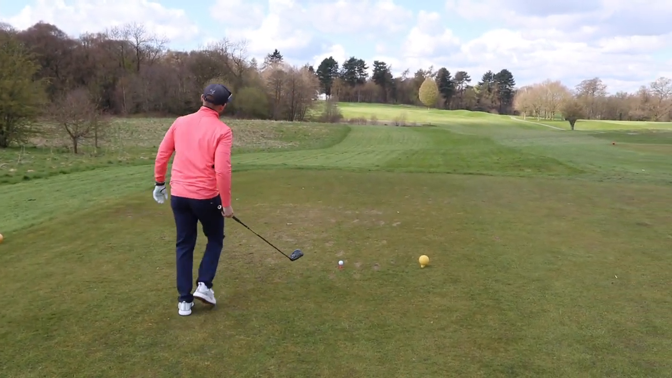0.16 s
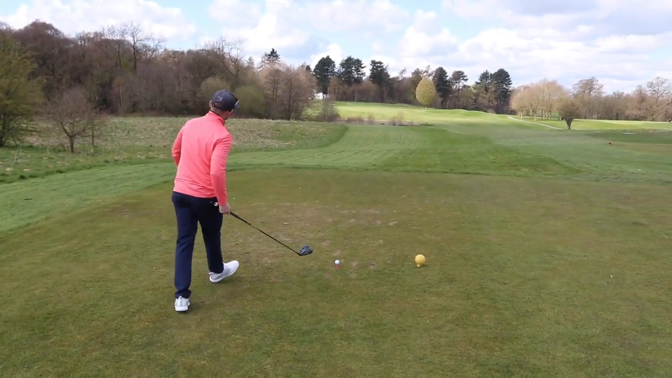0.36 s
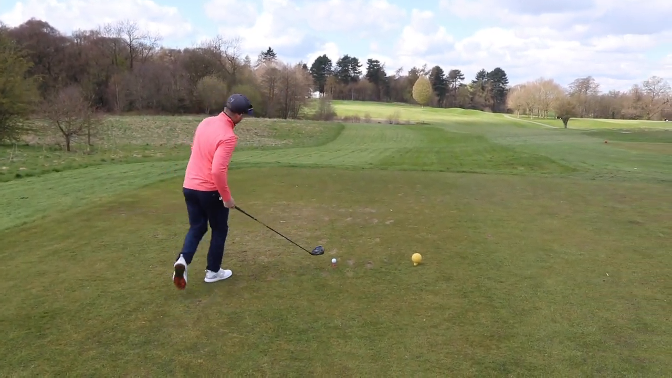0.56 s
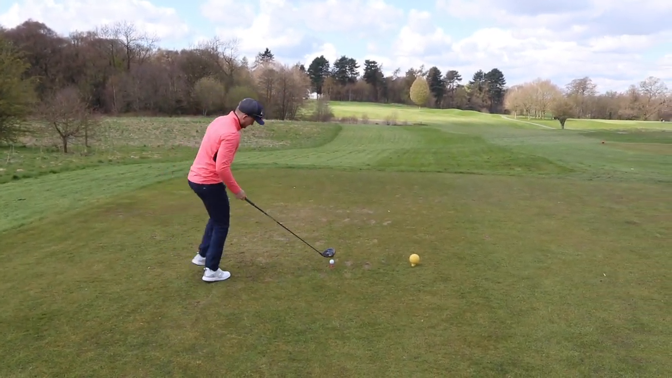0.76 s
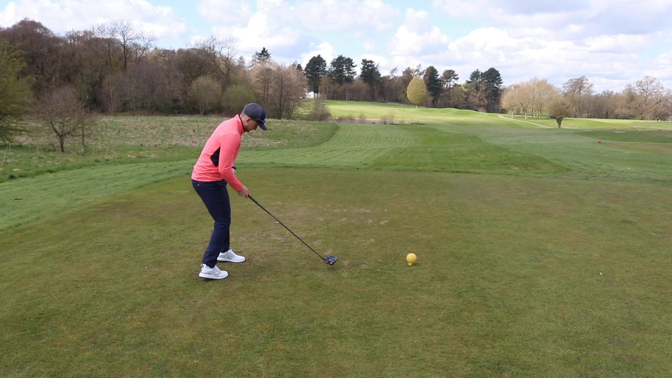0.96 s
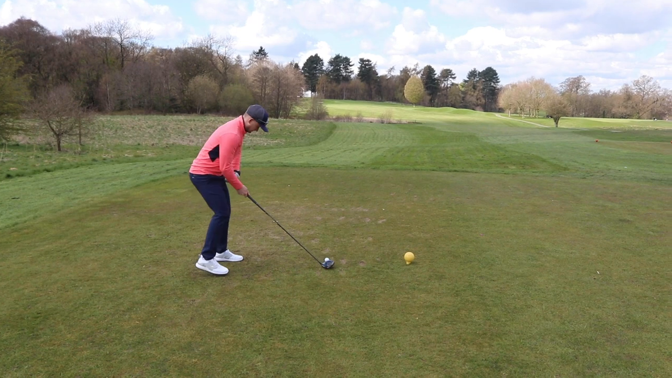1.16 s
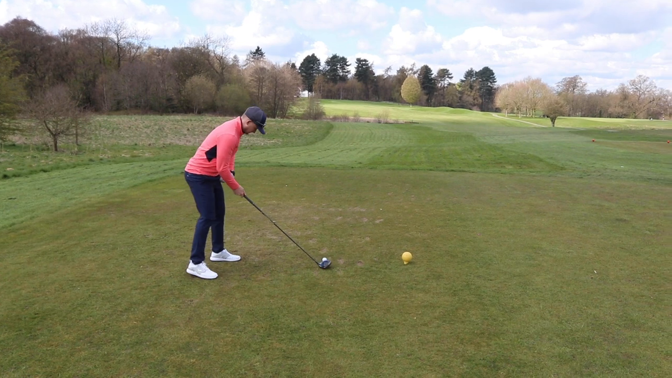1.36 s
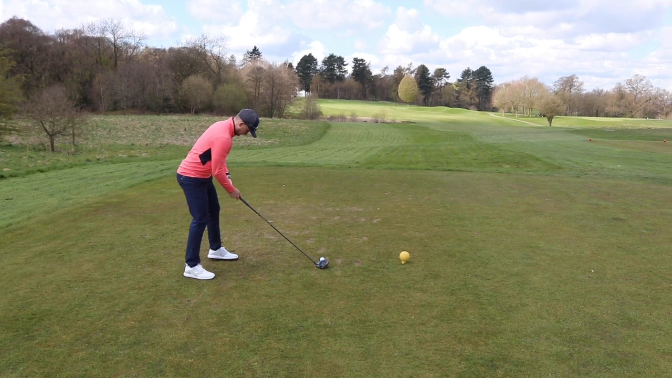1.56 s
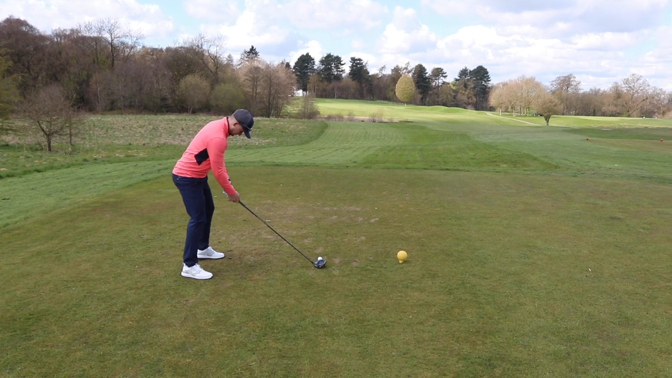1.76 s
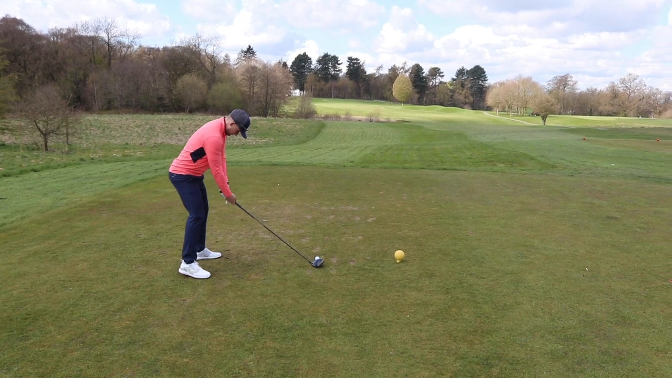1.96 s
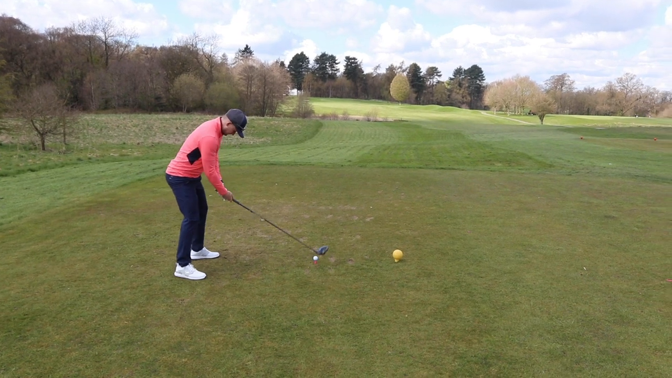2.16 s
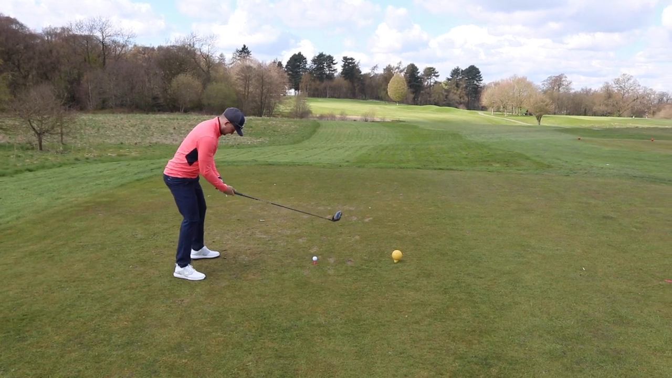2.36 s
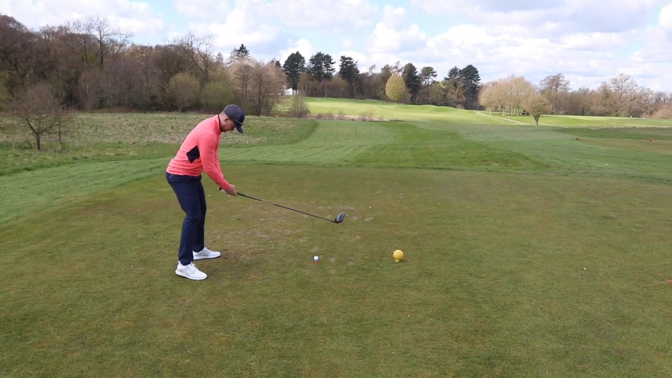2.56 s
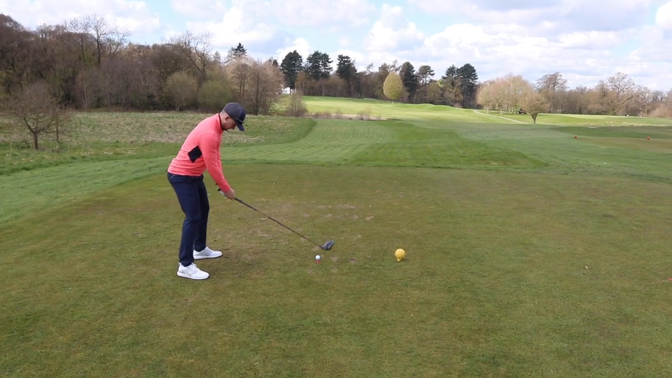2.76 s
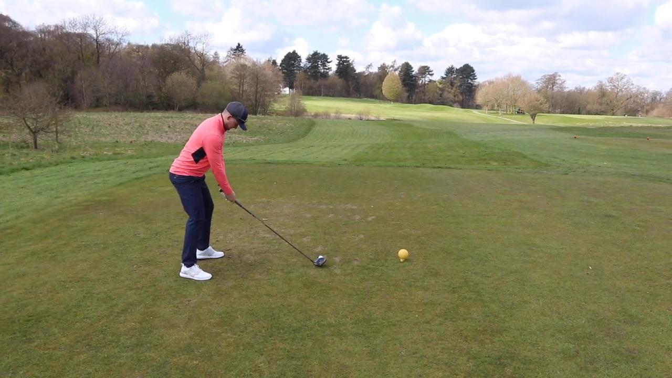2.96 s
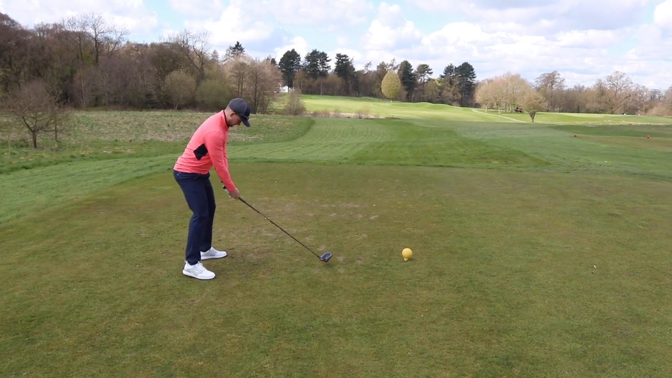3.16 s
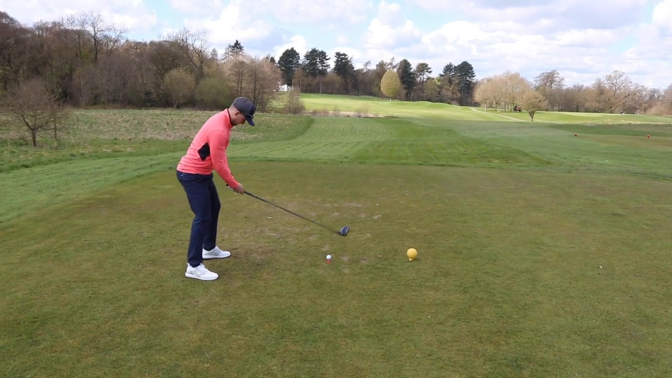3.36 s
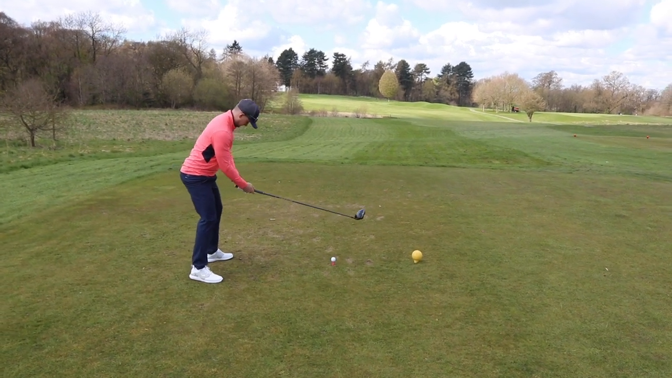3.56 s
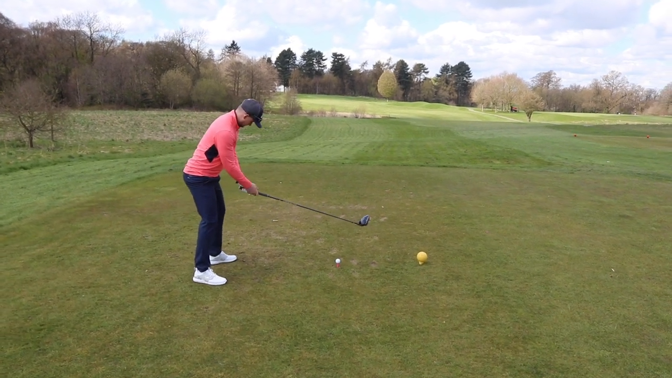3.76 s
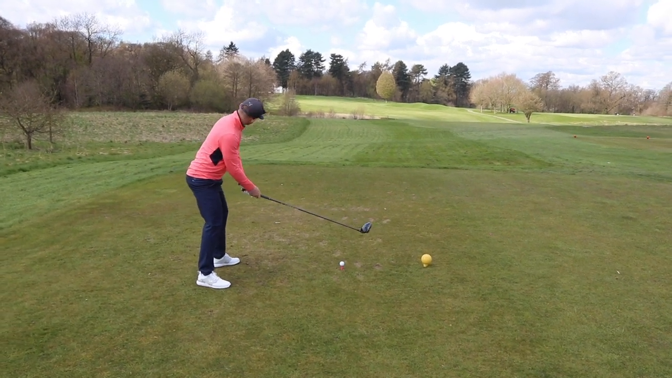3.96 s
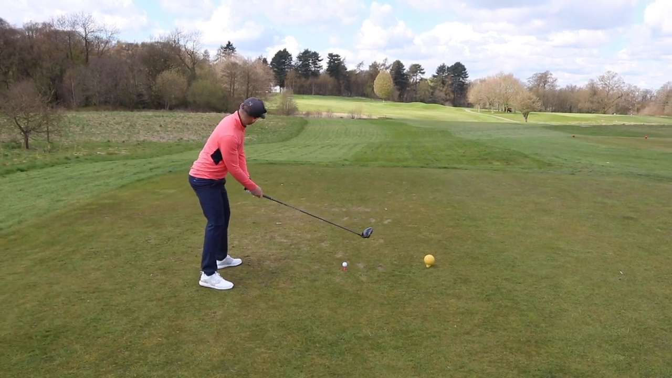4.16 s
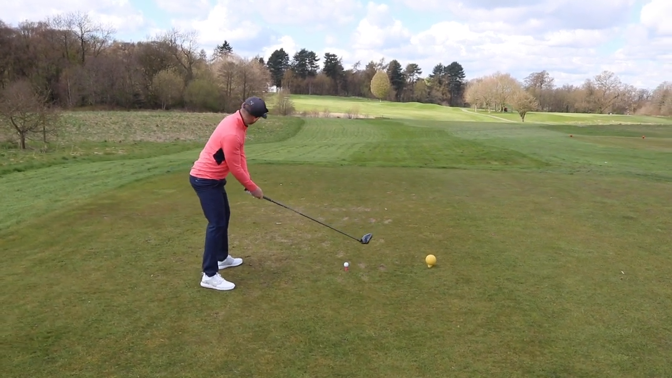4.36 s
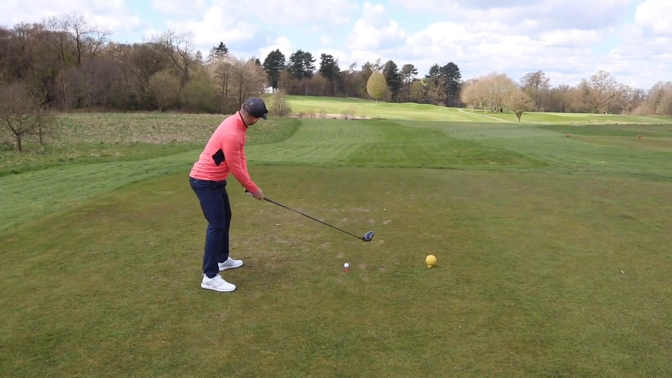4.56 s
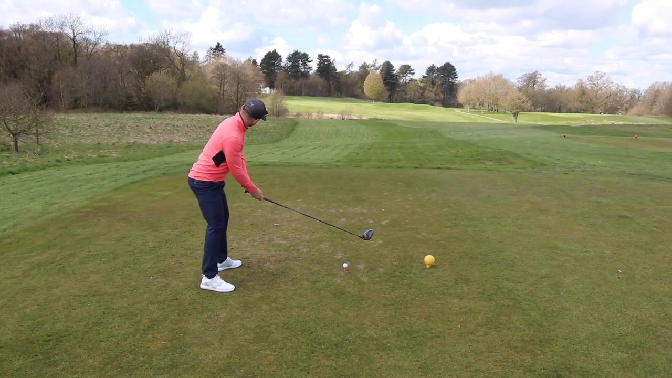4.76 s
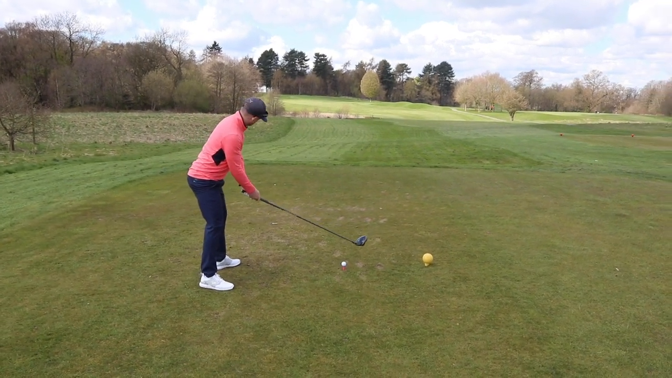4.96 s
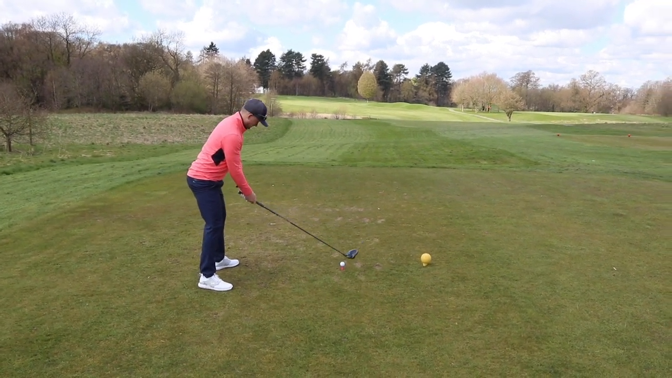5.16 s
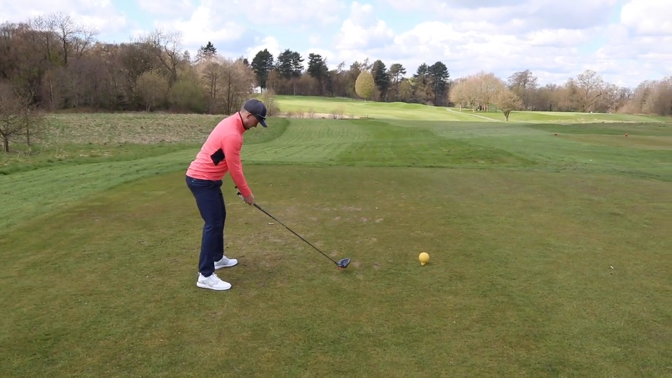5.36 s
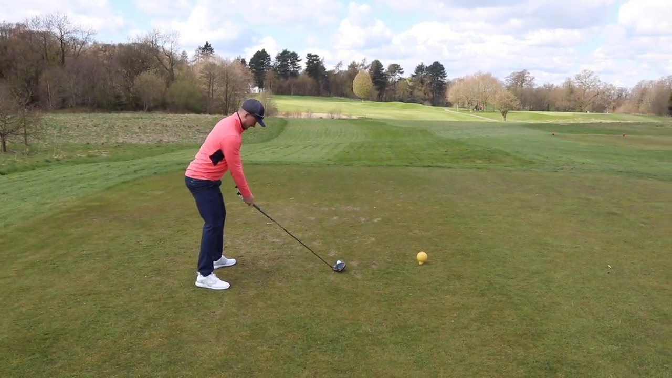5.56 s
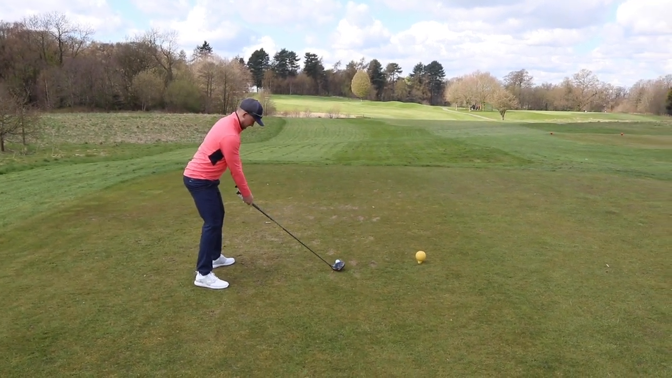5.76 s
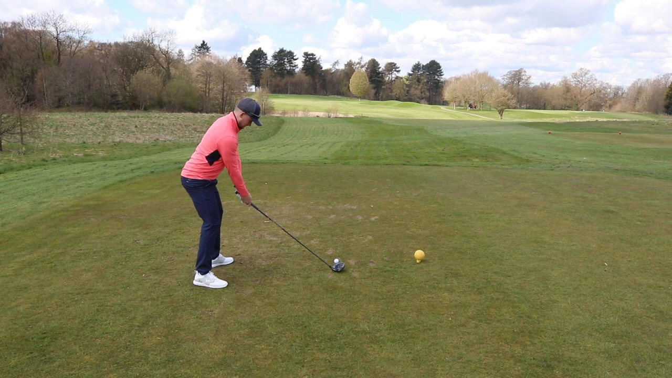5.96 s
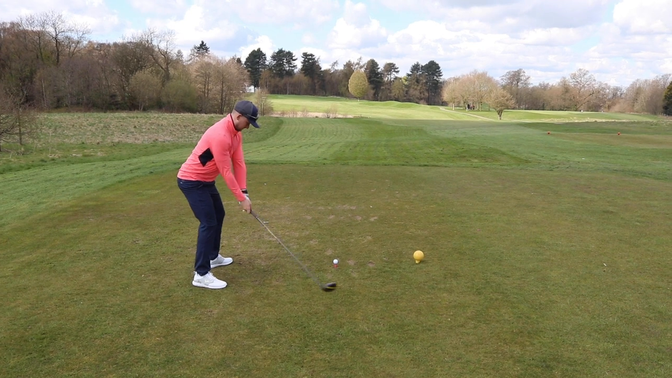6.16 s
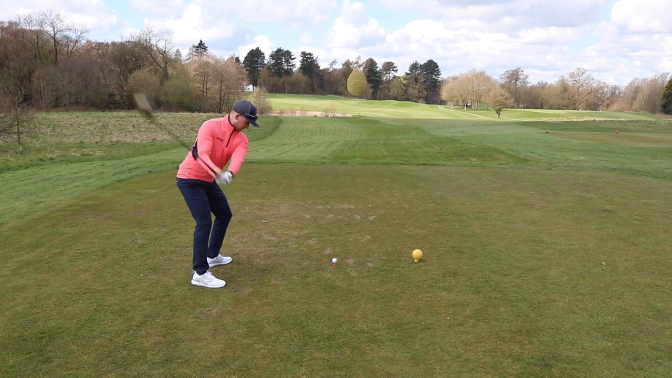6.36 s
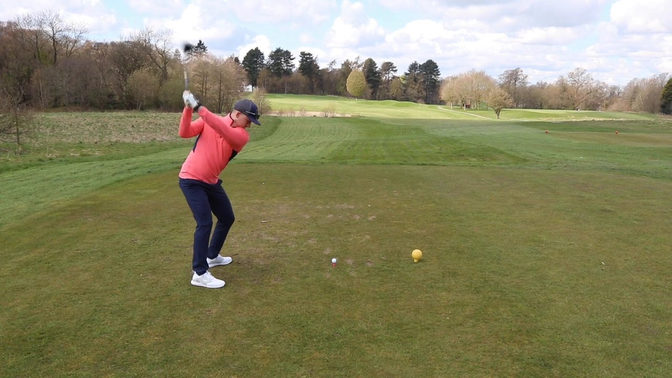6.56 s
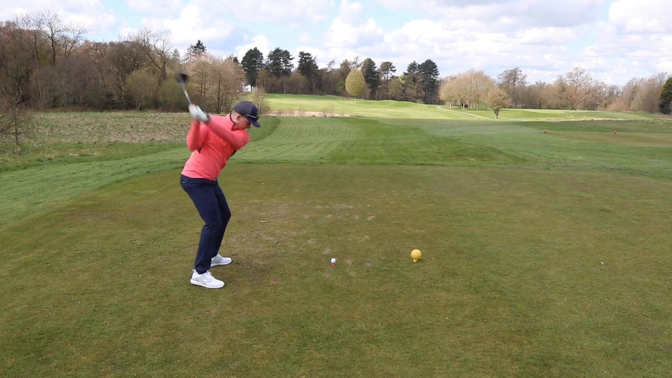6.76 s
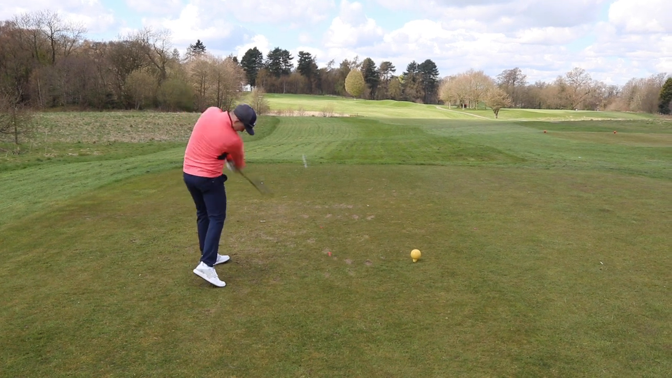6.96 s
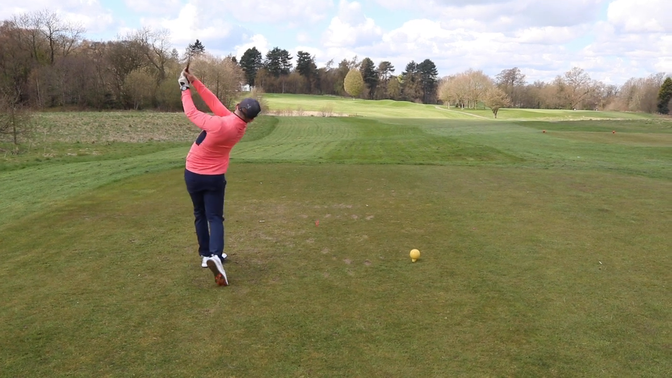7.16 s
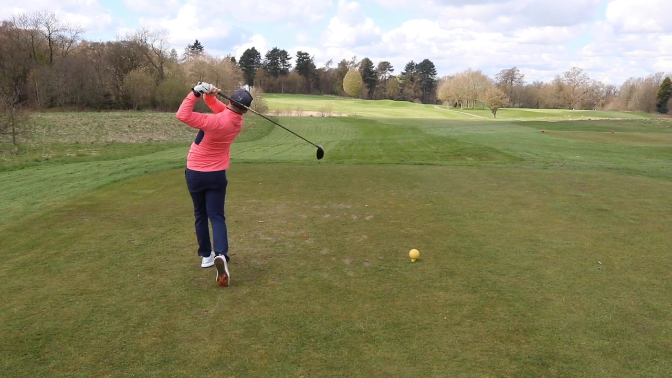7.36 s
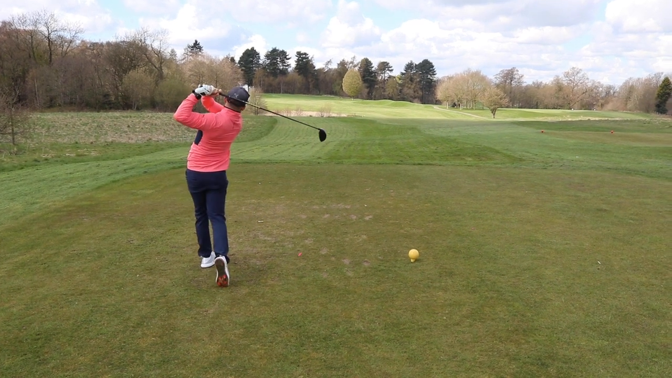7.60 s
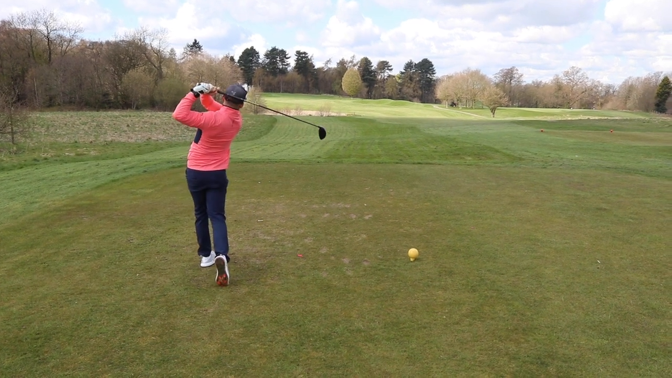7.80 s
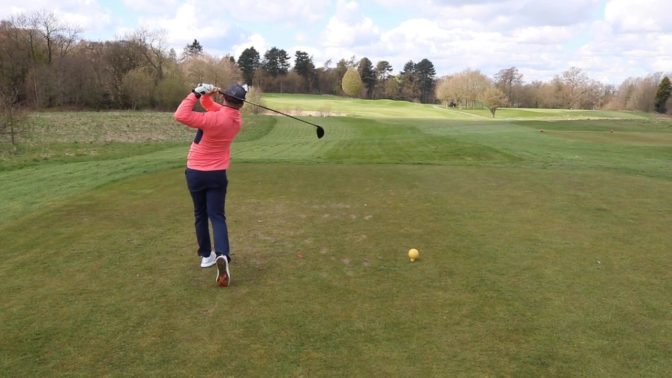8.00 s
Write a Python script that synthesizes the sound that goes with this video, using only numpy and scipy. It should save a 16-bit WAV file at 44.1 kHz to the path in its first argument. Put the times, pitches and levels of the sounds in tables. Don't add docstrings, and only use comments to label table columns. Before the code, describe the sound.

Soft wind rumble and far road hush dominate for seven seconds, with faint rooks, small gritty clothing creaks and a high songbird. Then a driver rushes down and hits a ball once: a dry, piercing crack with a short metallic ring, clipping the microphone. Grit and air wake fade quickly, a light tree-line echo follows, and the quiet background returns with a last short bird call.

```python
import sys
import numpy as np
from scipy import signal
from scipy.fft import rfft, irfft, next_fast_len
from scipy.io import wavfile
from scipy.ndimage import uniform_filter1d, map_coordinates

SR = 44100
rng = np.random.default_rng(int(sys.argv[2]) if len(sys.argv) > 2 else 0)


def ratio_of_db(decibels):
    return 10 ** (np.asarray(decibels, float) / 20)


def master(y):
    cut = np.clip(np.atleast_2d(y).T, -1, 1)
    pcm = np.round(cut * 32767)
    wavfile.write(sys.argv[1], SR, pcm.astype(np.int16))


N = 354211


def unit(x):
    return x / np.sqrt(np.mean(x ** 2) + 1e-20)


def along(points, hz):
    f, v = np.transpose(points)
    return np.interp(np.log(hz + 1), np.log(f + 1), v)


def curves(rows):
    s, *cols = np.transpose(rows)
    return [np.interp(np.arange(N) / SR, s, c) for c in cols]


def wobble(rate_hz):
    knots = rng.standard_normal(int(N * rate_hz / SR) + 4)
    return map_coordinates(knots, [np.arange(N) * rate_hz / SR])


def filtered(x, response):
    m = next_fast_len(len(x) + 8192)
    return irfft(rfft(x, m) * response(np.fft.rfftfreq(m, 1 / SR)), m)[:len(x)]


def resonant(x, modes):
    def response(f):
        return sum((-1) ** k * ratio_of_db(db) * 1j * f * width / (hz * hz - f * f + 1j * f * width)
                   for k, (hz, width, db) in enumerate(modes))
    return filtered(x, response)


def rush(spectrum, patchy_db):
    z = signal.stft(rng.standard_normal(N), nperseg=512)[2]
    field = uniform_filter1d(rng.standard_normal(z.shape), 6, 0)
    field = uniform_filter1d(field, 14, 1)
    x = signal.istft(z * ratio_of_db(patchy_db * unit(field)), nperseg=512)[1][:N]
    return unit(filtered(x, lambda hz: ratio_of_db(along(spectrum, hz))))


def add(track, s, x):
    part = track[round(s * SR):][:len(x)]
    part += x[:len(part)]


# (time [s], strength [dB])
GUSTS = [(0.0, -35.5), (0.38, -33.5), (0.69, -37), (1.07, -33), (1.72, -35.5), (1.85, -37), (3.13, -37.5),
         (3.35, -34.5), (4.02, -36), (4.29, -35), (5.23, -38.5), (5.57, -35.5), (6.71, -34), (7.07, -35.5),
         (7.67, -33.5), (8.03, -36.5)]
# (frequency [Hz], density [dB per Hz])
RUMBLE_SPECTRUM = [(12, -39.5), (20, -13), (54, 2), (139, -4), (235, -15.5), (284, -17), (500, -36),
                   (650, -55), (1100, -120)]
# (frequency [Hz], density [dB per Hz])
LEAF_SPECTRUM = [(2200, -26), (3000, 1.5), (4300, 2.5), (5200, -12.5), (6500, -28.5)]


def breeze():
    gust_db, = curves(GUSTS)
    rumble = ratio_of_db(gust_db + 1.5 + 0.53 * wobble(6)) * rush(RUMBLE_SPECTRUM, patchy_db=0.1)
    calm_db_per_s, gust_share = 0.3, 0.3
    leaves_db = -67.5 - calm_db_per_s * np.arange(N) / SR
    leaves_db += gust_share * (gust_db - gust_db.mean()) + 0.8 * wobble(1.5)
    return rumble + ratio_of_db(leaves_db) * rush(LEAF_SPECTRUM, patchy_db=0.5)


# (frequency [Hz], width [Hz], level [dB])
MACHINE_MODES = [(136.9, 9.6, 2.5), (811, 25, -20)]


def machine():
    return ratio_of_db(-42.5 + 1.497 * wobble(3.3)) * unit(resonant(rng.standard_normal(N), MACHINE_MODES))


# (time [s], tyre roar [dB])
TYRE_ROAR = [(0.0, -48), (0.92, -50.5), (1.63, -49), (2.21, -52), (5.3, -54), (6.28, -54.5), (6.93, -51),
             (7.69, -52.5), (8.03, -51.5)]
# (frequency [Hz], density [dB per Hz])
ROAD_SPECTRUM = [(180, -30.5), (300, -5), (565, -10.5), (732, -11), (792, -8), (1070, -10), (1190, -11),
                 (1460, -12.5), (1700, -15.5), (2420, -20.5), (3200, -36.5), (4160, -57.5), (7040, -120)]


def road():
    tyres_db, = curves(TYRE_ROAR)
    noise = rush(ROAD_SPECTRUM, patchy_db=1.4)
    tyres = filtered(noise, lambda hz: 1 / (1 + (1000 / (hz + 1)) ** 4))
    swell_share = 0.16
    engines_db = -54.5 + swell_share * (tyres_db - tyres_db.mean()) + 1.1 * wobble(2.3)
    engines = ratio_of_db(engines_db) * unit(noise - tyres)
    return engines + ratio_of_db(tyres_db - 0.77 + 0.55 * wobble(3.4)) * unit(tyres)


# (time [s], length [s], pitch [Hz], level [dB], hoarseness [0-1])
ROOK_CALLS = [
    (1.911, .099, 800, -47, 0.7),
    (2.637, .019, 1080, -48, .2),
    (3.015, .03, 650, -51, 0.5),
    (3.58, 0.058, 781, -42.5, 0.38),
    (8.017, 0.023, 660, -38.5, .4),
]


def rooks():
    out = np.zeros(N)
    rasp = wobble(300)
    for s, length_s, hz, db, hoarse in ROOK_CALLS:
        u = np.linspace(0, 1, round(length_s * SR))
        phase = 2 * np.pi * hz * length_s * u
        call = ratio_of_db(-17) * np.sin(phase) + np.sin(2 * phase) + 0.18 * np.sin(3 * phase)
        call *= np.sqrt(np.abs(np.sin(np.pi * u)))
        throat = 1 - hoarse + hoarse * rasp[round(s * SR):][:len(u)]
        add(out, s, ratio_of_db(db) * call[:len(throat)] * throat)
    return out


def whistle(length_s, start_hz, end_hz, bend):
    u = np.linspace(0, 1, round(length_s * SR))
    hz = start_hz + (end_hz - start_hz) * u ** bend
    return np.sqrt(np.abs(np.sin(np.pi * u))) * np.sin(2 * np.pi * np.cumsum(hz) / SR), hz


def beak(note, hz):
    return note * (0.22 + 0.78 * np.exp(-((hz - 5250) / 280) ** 2))


# (time [s], length [s], start [Hz], end [Hz], level [dB])
SONG_NOTES = [
    (3.845, .1, 5250, 4700, -67),
    (4.03, .08, 6650, 6900, -78),
    (4.0, .015, 5500, 5300, -64),
    (4.21, .015, 3900, 4070, -61),
    (4.262, 0.012, 4650, 4850, -62),
    (5.4, 0.085, 7100, 7000, -76),
]
# (time [s], length [s], start [Hz], end [Hz], level [dB])
CLUCK_NOTE = (8.0135, .011, 610, 670, -29)
PHRASES_DB = [-68, -67.5, -70, -63.5, -67, -64]


def songbirds():
    out = np.zeros(N)
    for s, length_s, start_hz, end_hz, db in [*SONG_NOTES, CLUCK_NOTE]:
        add(out, s, ratio_of_db(db) * whistle(length_s, start_hz, end_hz, bend=0.6)[0])
    first_s, every_s, fall_after_s, fall_over_db = 4.3, 0.1706, 0.073, 1.5
    for k, db in enumerate(PHRASES_DB):
        s = first_s + k * every_s
        rise = beak(*whistle(0.036, 4750, 5800, bend=1.4))
        fall = beak(*whistle(0.063, 6450, 3900, bend=1.1))
        add(out, s, ratio_of_db(db) * rise)
        add(out, s + fall_after_s, ratio_of_db(db + fall_over_db) * fall)
    return out * ratio_of_db(1.3 * wobble(120))


# (time [s], peak [dB], low part [dB], middle part [dB])
RASPS = [(2.6124, -56, 5, -4), (2.887, -44, 7.5, -12), (3.021, -51.5, 11, -12), (3.075, -57, 15, 3),
         (3.77, -51.5, 0, 2), (3.839, -53, 1, 5), (3.998, -55, -8, 1), (4.074, -55, 10, 0),
         (4.193, -52, -9, -5), (4.262, -58, -2, -3), (4.439, -52, 5, 3.5), (6.6776, -42.5, 11, -7),
         (6.7161, -42.5, 10.5, -8), (6.7525, -53, 13, -6), (6.827, -53.5, 6, -13), (6.911, -58, -3, -13.5),
         (3.597, -60, 23, 3), (3.629, -61, 22, 2)]
# (frequency [Hz], width [Hz], level [dB])
CLOTH_MODES = [(1510, 350, 3.5), (2500, 450, -2.5), (2800, 270, 5.5), (3630, 900, -1.5), (4560, 1000, 0.5),
               (6460, 2000, -24)]


def creaks():
    low, middle, high, snap = np.zeros((4, N))
    grit = rng.standard_normal((len(RASPS), 4000))
    t = np.arange(grit.shape[1]) / SR
    rasp_s = 0.015
    envelope = (1 - np.exp(-t / 0.001)) * np.exp(-(t / rasp_s) ** 0.87)
    for (s, db, low_db, middle_db), g in zip(RASPS, grit):
        burst = g * np.abs(g) ** 0.34 * envelope
        add(high, s, ratio_of_db(db + 2.0) * burst)
        add(middle, s, ratio_of_db(db + middle_db + 10.5) * burst)
        add(low, s, ratio_of_db(db + low_db + 4) * burst)
    low = resonant(resonant(low, CLOTH_MODES[:2]), CLOTH_MODES[:2])
    middle = resonant(middle, CLOTH_MODES[2:3])
    high = resonant(high, CLOTH_MODES[3:])
    snap_t60_s, snap_above_hz = 0.012, 4000
    add(snap, 6.914, ratio_of_db(-54 - 60 * t / snap_t60_s) * rng.standard_normal(len(t)))
    snap = filtered(snap, lambda hz: 1 / (1 + (snap_above_hz / (hz + 1)) ** 4))
    return snap + low + middle + high


# (frequency [Hz], level [dB])
ECHO_COLOUR = [(300, -20), (1200, -8), (2500, -6), (3200, -4), (4500, 0), (5500, -11), (8000, -20),
               (12000, -34)]
# (frequency [Hz], T60 [s])
TREE_DECAY = [(300, .25), (2000, 0.64), (5000, 0.85), (12000, 0.075)]
# (delay [s], level [dB], spread [s])
TREE_SLAPS = [
    (.137, -63, .005),
    (.158, -51, .005),
    (.172, -57, .005),
]


def trees():
    hit_s, hit_db = CONTACT[0]
    hz, t, z = signal.stft(rng.standard_normal(SR), SR, nperseg=256)
    colour = ratio_of_db(along(ECHO_COLOUR, hz)[:, None])
    decay = ratio_of_db(-60 * np.maximum(t - 0.16, 0) / along(TREE_DECAY, hz)[:, None])
    tail = signal.istft(z * colour * decay, SR, nperseg=256)[1]
    tail = tail / np.std(tail[:SR // 10])
    t = np.arange(len(tail)) / SR
    swell = ratio_of_db(-60.5) * np.clip((t - 0.05) / 0.1, 0, 1)
    slaps = sum(ratio_of_db(db) * np.exp(-((t - delay_s) / spread_s) ** 2) for delay_s, db, spread_s in TREE_SLAPS)
    out = np.zeros(N)
    add(out, hit_s, ratio_of_db(hit_db) * tail * (swell + slaps))
    return out


# (time [s], rush [dB], shedding tone [Hz])
DOWNSWING = [
    (6.94, -64, 906),
    (6.975, -53, 748.6),
    (7.0, -39, 719),
    (7.028, -30, 896),
    (7.058, -25, 870),
]
# (frequency [Hz], density [dB per Hz])
WAKE_SPECTRUM = [(120, -39.5), (200, -9.5), (370, -7), (1020, -7), (1150, -7.5), (2510, -20.5), (4310, -26),
                 (6420, -37.5), (15000, -50)]
# (frequency [Hz], density [dB per Hz])
GRIT_SPECTRUM = [(1500, -25), (2700, -3), (3100, 0), (4500, -2), (6500, -13), (8000, -20), (10000, -32),
                 (15000, -45)]


def swing():
    _, end_db, end_hz = DOWNSWING[-1]
    hit_s = CONTACT[0][0]
    level_db, tone_hz = curves([(6.9, -80, DOWNSWING[0][2]), *DOWNSWING,
                                (hit_s, end_db - 5.5, end_hz),
                                (hit_s + 0.023, end_db - 29.5, end_hz),
                                (7.3, -120, end_hz)])
    fuzz = unit(filtered(rng.standard_normal(N), lambda hz: 1 / (1 + (hz / 120) ** 2)))
    tone = fuzz * np.sin(2 * np.pi * np.cumsum(tone_hz) / SR)
    since = np.arange(N) / SR - hit_s
    t = np.maximum(since, 0)
    grit_t60_s, after_3db_s = 0.13, 0.04
    grit = (since >= 0) * ratio_of_db(-17 - 60 * t / grit_t60_s)
    after = (since >= 0) * ratio_of_db(-37 - 3 * (t / after_3db_s) ** 1.5)
    wake = rush(WAKE_SPECTRUM, patchy_db=1.5)
    before = ratio_of_db(level_db) * (0.92 * wake + 0.8 * tone)
    return before + after * wake + grit * rush(GRIT_SPECTRUM, patchy_db=3.5)


# (frequency [Hz], level [dB], T60 [s])
FACE_MODES = [(432, -19, .03), (1040, -19, .028), (1564, -20, .026), (2280, -27, .025), (2787, -14, .055),
              (3035, -21, .04), (3592, -2.5, .056), (3790, -23, .05), (4045, -15, .05), (4150, -19, .05),
              (4345, -9, .028), (4870, -10, .028), (5530, -12, .026), (6650, -22, .026)]
# (frequency [Hz], level [dB], T60 [s])
SOLE_MODES = [(1768, -55, 2.5), (2740, -38, .1), (2865, -37, .27), (2990, -38, .1), (3290, -38, .26),
              (3950, -38, .1)]


def head_ring(t):
    turn_rise, turn_s, turn_shape = 0.2, 0.1, 1.5
    gained_s = np.cumsum(turn_rise * (1 - np.exp(-(t / turn_s) ** turn_shape))) / SR
    face_t = t + 0.5 * gained_s
    ring = sum(ratio_of_db(db - 60 * t / t60) * np.sin(2 * np.pi * hz * face_t) for hz, db, t60 in FACE_MODES)
    facing = np.clip(t / 0.04, 0, 1) / (1 + (t / 0.155) ** 14)
    for hz, db, t60 in SOLE_MODES:
        flutter = ratio_of_db(3 * wobble(200)[:len(t)])
        phase = 2 * np.pi * hz * (t + gained_s) + 0.4 * wobble(120)[:len(t)]
        ring = ring + facing * flutter * ratio_of_db(db - 5.0 - 60 * t / t60) * np.sin(phase)
    return ring


# (time [s], peak [dB])
CONTACT = [
    (7.068, 5.5),
]
# (frequency [Hz], level [dB])
CRACK_COLOUR = [(150, -29), (400, -7.5), (1000, -3), (2000, -6.5), (5000, -3), (8000, -24), (10500, -14),
                (15000, -26.5)]


def strike():
    (hit_s, db), = CONTACT
    t = np.arange(SR // 2) / SR
    ring = head_ring(t) * (1 - np.exp(-t / 0.0008))
    crack_t60_s = 0.013
    crack = unit(filtered(rng.standard_normal(len(t)), lambda hz: ratio_of_db(along(CRACK_COLOUR, hz))))
    crack = crack * ratio_of_db(-60 * t / crack_t60_s)
    u = t / 0.00016
    push = u * np.exp(1 - u) * (1 - u / 2)
    out = np.zeros(N)
    add(out, hit_s, ratio_of_db(db + 9.0) * (ring + ratio_of_db(-10.5) * crack + ratio_of_db(1) * push))
    return signal.sosfilt(signal.butter(2, 300, 'high', fs=SR, output='sos'), out)


def scene():
    background = breeze() + machine() + road() + rooks() + songbirds()
    return (background + creaks() + trees() + swing() + strike())[None]


def band_limit(x):
    return signal.sosfilt(signal.butter(12, 21850, fs=SR, output="sos"), x)


# (frequency [Hz], density [dB per Hz])
HISS_SPECTRUM = [(2900, -29), (5000, -2), (5500, -6), (10000, -5), (13600, -4), (15700, -4.5)]


def record(dry):
    t = np.arange(SR // 2) / SR
    attack_s, release_s = 0.008, 0.085
    duck = (1 - np.exp(-t / attack_s)) * np.exp(-(t / release_s) ** 2)
    over = np.abs(dry[0]) > 1
    cut_db = -15 * signal.fftconvolve(over / max(over.sum(), 1), duck)[:N]
    hiss = ratio_of_db(-70.5 + 0.4 * cut_db) * rush(HISS_SPECTRUM, patchy_db=0.6)
    x = np.clip(dry[0] * ratio_of_db(cut_db) + hiss, -0.97, 0.97)
    top_hz = 15750
    x = filtered(x, lambda hz: 1 / (1 + (hz / top_hz) ** 120))
    return band_limit(x[None])


dry = scene()
out = record(dry)
master(out)
```